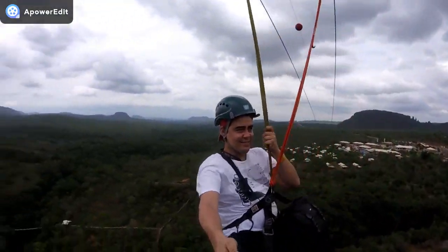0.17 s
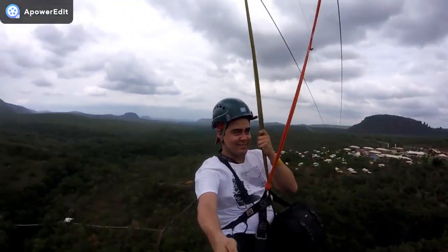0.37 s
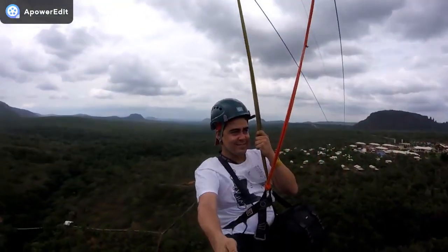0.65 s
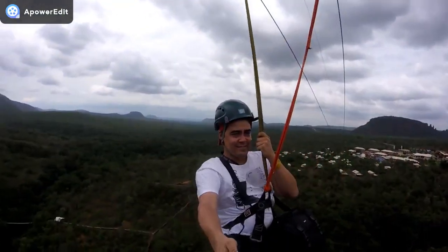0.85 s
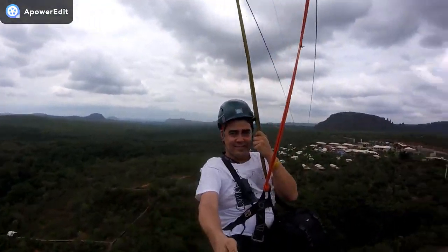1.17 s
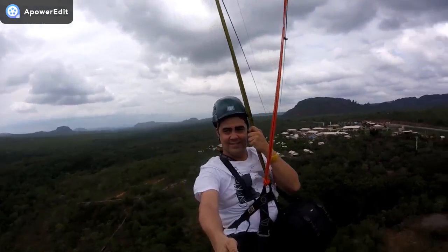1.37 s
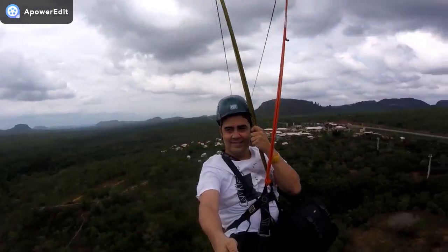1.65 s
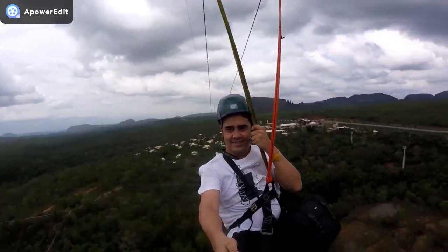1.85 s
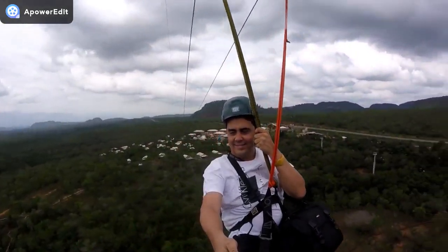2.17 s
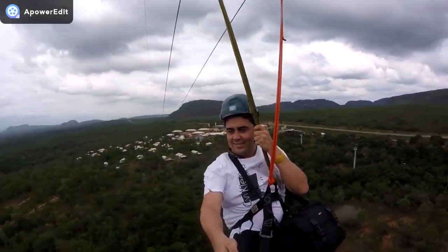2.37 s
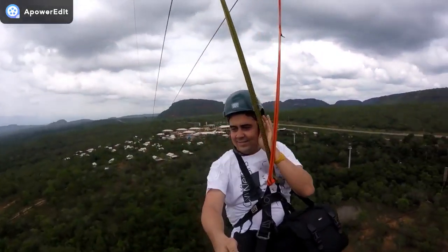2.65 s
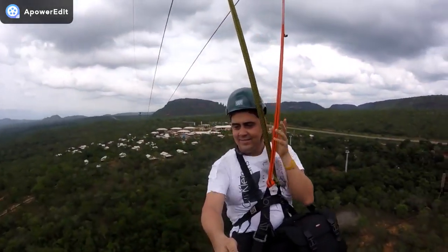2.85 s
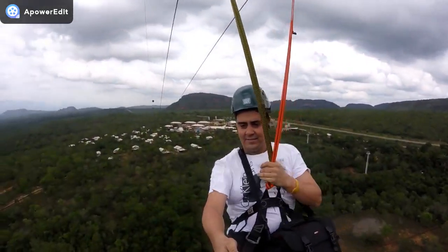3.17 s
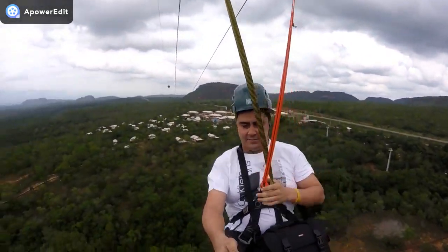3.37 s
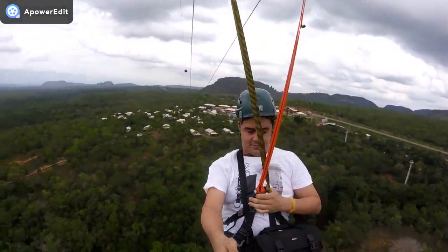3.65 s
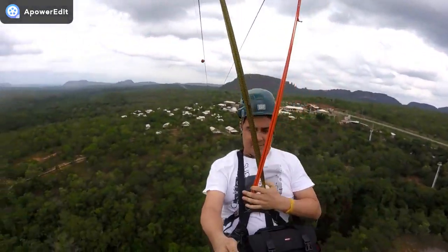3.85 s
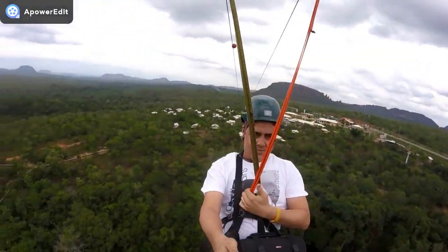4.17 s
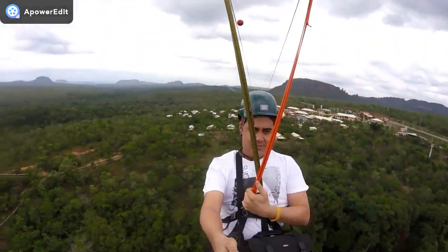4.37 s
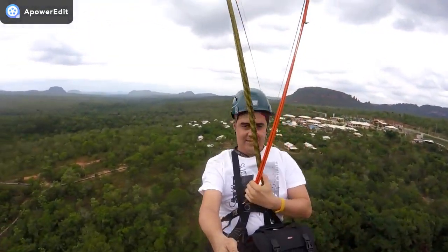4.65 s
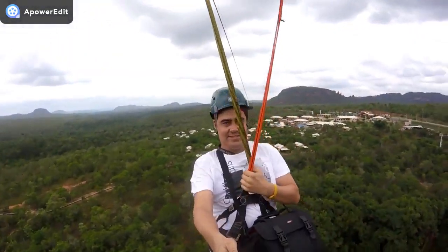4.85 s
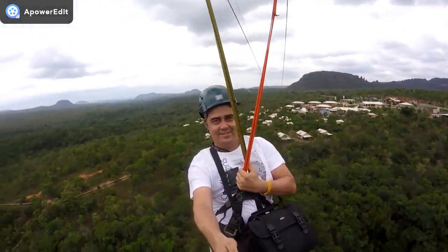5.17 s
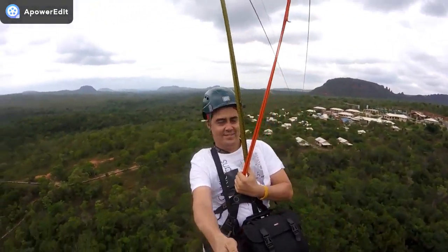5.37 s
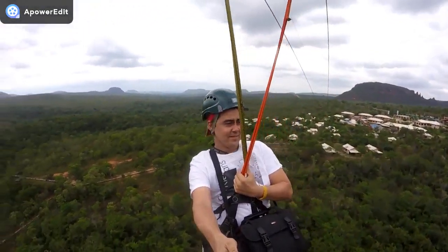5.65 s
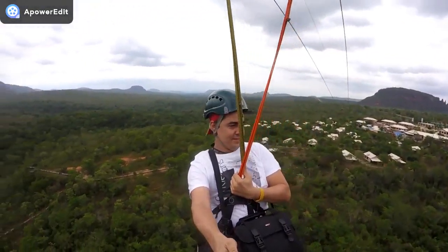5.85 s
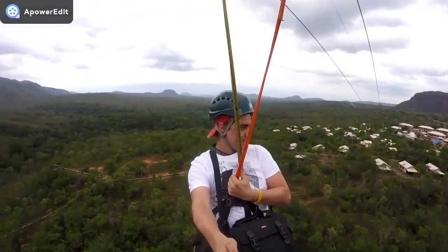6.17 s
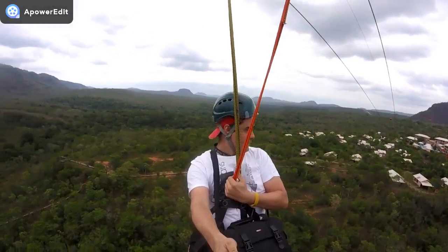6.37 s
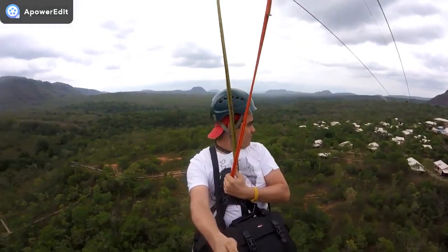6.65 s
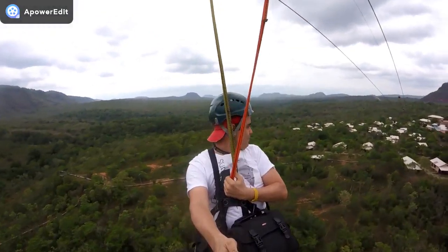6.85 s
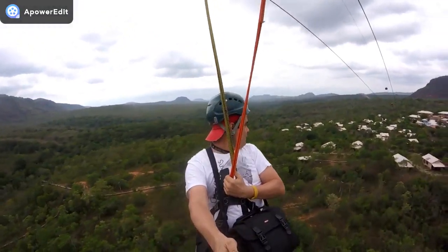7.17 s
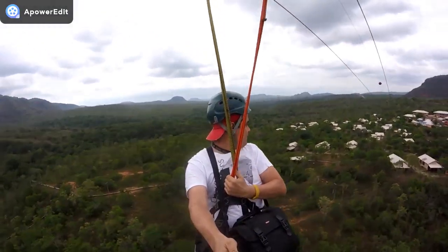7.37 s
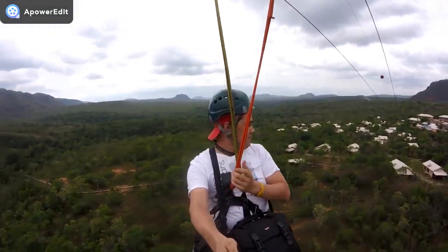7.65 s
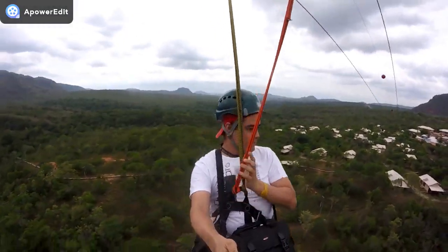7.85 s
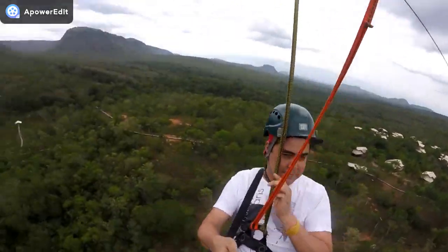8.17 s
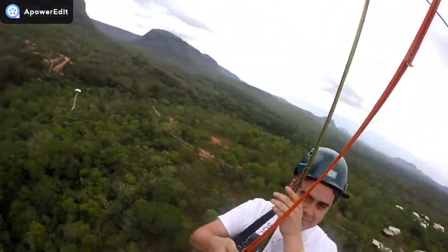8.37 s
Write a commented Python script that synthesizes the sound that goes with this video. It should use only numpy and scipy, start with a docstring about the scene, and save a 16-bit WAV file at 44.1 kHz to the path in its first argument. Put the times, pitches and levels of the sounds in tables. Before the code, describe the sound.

Outdoors high on a zipline, strong wind buffets a cased microphone held in the airstream. Deep rumble heaves and thumps throughout, densest in the first three seconds with light slapping flutters. A hollow, breathy hum swells and fades, while hiss shivers above. A thin high pulley whine runs beneath, sinking slightly in pitch. Near the end the hum sharpens into a loud, wavering hoot.

```python
"""On a zipline: a rider glides down the cable, holding a cased camera out into a strong airstream.
Wind buffets the microphone as low noise whose level heaves and thumps. Eddies blow a hollow wavering hum
on the case, as noise, spread tones and a tone; fine turbulence hisses as noise bands and wall resonances.
The trolley's pulleys run over the strands of the steel cable: harmonics of the strand rate make a thin
whine that sinks as the ride slows."""
import sys
import numpy as np
from scipy import signal
from scipy.fft import rfft, irfft, next_fast_len
from scipy.io import wavfile
from scipy.ndimage import uniform_filter1d

SR = 44100
rng = np.random.default_rng(int(sys.argv[2]) if len(sys.argv) > 2 else 0)


def store_wav(level_fs):
    """Save 16-bit WAV to argv[1]."""
    pcm = np.round(np.clip(np.atleast_2d(level_fs), -1, 1) * 32767)
    wavfile.write(sys.argv[1], SR, pcm.T.astype(np.int16))


N = 375732  # samples


def from_db(db):
    """Decibels to gain."""
    return 10 ** (np.asarray(db) / 20)


def rms_one(x):
    """Scale to unit rms."""
    return x / np.sqrt(np.mean(x ** 2) + 1e-20)


def in_time(rows):
    """Each column of a curve, joined by straight lines, at every sample."""
    times, *columns = np.transpose(rows)
    t = np.arange(N) / SR
    return [np.interp(t, times, column) for column in columns]


def swells(rows):
    """Bell-shaped changes of level in dB, from rows of (t/s, half-length/s, change/dB)."""
    t = np.arange(0, N + 100, 100) / SR     # a coarse grid is enough for such slow curves
    change_db = np.zeros(len(t))
    for centre_s, half_s, db in rows:
        change_db += db * np.exp(-np.minimum(((t - centre_s) / half_s) ** 2, 30))
    return np.interp(np.arange(N) / SR, t, change_db)


def drift(rate):
    """Smooth random motion of rms 1 that turns about rate times a second: noise through two equal poles."""
    step = 20       # samples between the points of the slow motion
    pole = np.exp(-2 * np.pi * rate * step / SR)
    noise = rng.standard_normal(N // step + 2002)
    slow = signal.lfilter([1], [1, -2 * pole, pole ** 2], noise)[2000:]     # drop the filter's start-up
    return np.interp(np.arange(N) / step, np.arange(len(slow)), rms_one(slow))


def shaped(x, gain_at):
    """Filter x by a gain that is a function of frequency; unit rms."""
    size = next_fast_len(N + SR // 4)
    hz = np.maximum(np.arange(size // 2 + 1) * SR / size, 1)
    return rms_one(irfft(rfft(x, size) * gain_at(hz), size)[:N])


def coloured(points):
    """Noise with a colour given as (f/Hz, density/dB), silent outside its range; unit rms."""
    freqs, levels = np.transpose(points)

    def gain_at(hz):
        return from_db(np.interp(np.log(hz), np.log(freqs), levels, left=-np.inf, right=-np.inf))

    return shaped(rng.standard_normal(N), gain_at)


def resonant(drive, modes):
    """The drive rings in steep-sided resonances (f/Hz, width/Hz, level/dB), added in power; unit rms."""
    def gain_at(hz):
        power = 0
        for f, width, db in modes:
            power = power + (from_db(db) / (1 + 2 * ((hz - f) / width) ** 2)) ** 2
        return np.sqrt(power)

    return shaped(drive, gain_at)


def steadied(x, seconds):
    """Hold the strength of x even over spans longer than the given time."""
    power = uniform_filter1d(x ** 2, max(int(seconds * SR), 2))
    return x / np.sqrt(power + 1e-6)


def wavering(hz, width_hz):
    """A tone whose strength and phase wander, spreading it over about the given width; unit rms."""
    phase = 2 * np.pi * np.cumsum(hz) / SR
    return rms_one(drift(width_hz) * np.cos(phase) + drift(width_hz) * np.sin(phase))


def buffeting():
    """Large eddies press on the microphone and now and then thump it; smaller ones flutter on top."""
    # push of the wind, before trims: t/s, rumble level/dB, flutter level/dB
    wind = [(0, -9, -21), (.2, -13.5, -19.5), (.65, -18, -24), (.82, -16, -20.5), (1.33, -14.5, -18.5),
            (1.6, -12.5, -23), (2.0, -12, -21), (2.5, -14.5, -22.5), (2.8, -15, -16), (3.2, -15, -19),
            (3.8, -16, -17), (4.15, -12.5, -21), (4.75, -15, -24), (5.6, -14.5, -19), (6.05, -20, -16.5),
            (7.1, -14, -22), (8.07, -17, -16), (8.25, -26, -24)]
    # thumps (+) and lulls (-) of the large eddies: t/s, change of the rumble/dB
    thumps = [(.05, -2.5), (.24, 5), (.44, 5.5), (.53, -1), (.8, -3), (.92, 5.5), (1.08, 4), (1.48, 5.5),
              (1.56, -6), (1.77, 5.5), (2.66, -8), (2.82, 7), (3.0, -7), (3.08, 6), (4.62, -2), (5.17, 8),
              (5.7, 6.5), (6.17, -10)]
    # noise colour of the large eddies: f/Hz, density/dB
    rumble_colour = [(8, -17), (16, -5), (25, 1.5), (38, 7.5), (50, -9), (65, -8), (100, -42)]
    # noise colour of the smaller eddies: f/Hz, density/dB
    flutter_colour = [(40, -11), (62, 0.5), (90, 0.5), (115, -6.5), (150, -12.5), (200, -25), (300, -44),
                      (600, -56)]
    thump_half_s = 0.034
    sway_db, sway_per_s = 1.66, 6       # chance swells of the rumble, besides the thumps

    rumble_db, flutter_db = in_time(wind)
    thump_db = swells([(s, thump_half_s, db) for s, db in thumps])
    heave_db = thump_db + sway_db * drift(sway_per_s)
    rumble = from_db(rumble_db + heave_db - 0.9) * steadied(coloured(rumble_colour), seconds=0.162)
    flutter = from_db(flutter_db + 0.06) * steadied(coloured(flutter_colour), seconds=0.17)
    return rumble + flutter


def case_hum(gust):
    """Eddies ring the cavities: ragged ones all of them, evenly shed ones those near their own rate."""
    # eddies shed by the case: t/s, shedding rate f/Hz, regular share 0-1
    eddies = [(0, 335, 0.07), (.7, 312, .25), (1.3, 300, 0.21), (2.5, 330, 0.12), (3.8, 330, 0.01),
              (4.5, 340, .47), (5.0, 330, 0.66), (5.75, 267.9, 0.77), (6.4, 303.6, 0.64), (6.85, 320, 1),
              (7.1, 314, 0.99), (7.42, 328, .63), (7.7, 314, .7), (8.1, 316, 0.89), (8.16, 356, 0.99),
              (8.27, 369, 1), (8.4, 359, 0.98), (8.52, 377, 1)]
    # how hard the eddies blow on the case, before trim and gusts: t/s, level/dB
    blowing = [(0, -30), (.65, -20.5), (1.05, -22), (1.45, -27.5), (2.4, -32), (3.5, -29), (4.35, -24),
               (4.72, -16.5), (5.0, -21.5), (5.4, -24.5), (5.7, -22), (6.45, -23), (6.98, -14), (7.5, -20),
               (8.1, -20), (8.17, -10), (8.36, -7.8), (8.52, -11)]
    # brief surges (+) and stalls (-) of the hum: t/s, half-length/s, change/dB
    surges = [(.09, 0.026, 13), (.52, .02, 3), (.62, 0.013, 3.5), (.71, 0.018, 6.5), (.82, 0.027, 7.5),
              (.9, 0.046, -8), (1.11, .02, 5), (1.21, 0.036, -15), (1.28, 0.017, 3), (1.95, .02, 11),
              (5.24, .05, -10), (6.07, .025, 7), (6.86, .035, 1.5), (6.93, .02, -17), (7.19, 0.023, -13),
              (7.43, 0.031, -12), (8.0, .015, 2.5), (8.05, .02, -5)]
    # air cavities of the case: f/Hz, width/Hz, relative level/dB
    cavities = [(260, 116, -13), (316.4, 27, -8.5), (353.3, 18.7, 0), (396, 32, -11), (444, 29, -11.5)]
    # a narrow gap that rings along more steadily: f/Hz, width/Hz, relative level/dB
    narrow_gap = [(440.7, 31, 0)]
    # shed faster than this, the eddies turn largely into a tone at their own shedding rate
    lock_hz, lock_range_hz, lock_share = 337.5, 16, 0.71

    shed_hz, regular = in_time(eddies)
    hum_db = in_time(blowing)[0] + swells(surges)
    locked = lock_share * np.clip((shed_hz - lock_hz) / lock_range_hz, 0, 1)

    ragged = steadied(resonant(rng.standard_normal(N), cavities), seconds=0.11)
    sung = steadied(resonant(wavering(shed_hz, width_hz=33), cavities), seconds=0.053)
    tone_hz = shed_hz * (1 + 0.0258 * drift(20.7))
    tone = np.sqrt(2) * np.sin(2 * np.pi * np.cumsum(tone_hz) / SR)
    even = np.sqrt(1 - locked) * sung + np.sqrt(locked) * tone      # the two beat against each other
    hum = np.sqrt(1 - regular) * ragged + np.sqrt(regular) * even

    gust_db = 0.83 * gust * (1.5 - regular)     # ragged hum shivers more
    gap_db = -31 + 0.26 * hum_db                # swells only a little with the hum
    gap = from_db(gap_db) * resonant(rng.standard_normal(N), narrow_gap)
    return from_db(hum_db - 1.0 + gust_db) * hum + gap


def slap_envelope(rise_s, fall_s):
    """Each short slap of air on the case swells quickly and dies away exponentially."""
    # slaps, each peaking one rise time after its t: t/s, relative peak level/dB
    slaps = [(0.093, -11), (0.1344, -14.5), (0.1824, -11.5), (0.862, -12), (0.882, -10.5), (1.105, -15),
             (1.2136, -12), (1.2757, -12.5), (1.3864, -10), (1.461, -11.5), (1.6444, -12), (1.7374, -14)]
    envelope = np.zeros(N)
    for s, db in slaps:
        near = np.arange(max(int((s - 0.05) * SR), 0), min(int((s + 0.15) * SR), N))
        past_peak = near / SR - s - rise_s
        decay = np.maximum(-past_peak / rise_s, past_peak / fall_s).clip(0, 20)
        envelope[near] += from_db(db) * np.exp(-decay)
    return envelope


def airstream(gust):
    """Fine turbulence hisses on the case; all its bands shiver with the same gusts."""
    # broad rush, before trim and gusts: t/s, level/dB
    rush_level = [(0, -38), (.12, -31.5), (.3, -38.5), (.65, -38), (.85, -36), (1.8, -34), (2.5, -35.5),
                  (3.75, -30.5), (4.35, -29.5), (4.7, -33), (4.95, -31.5), (5.9, -34.5), (6.3, -38),
                  (7.9, -37), (8.25, -41.5), (8.52, -35)]
    # hiss in the case walls, which swells and ebbs as the rider swings, before trim and gusts: t/s, level/dB
    hiss_level = [(0, -31.5), (1.35, -28.5), (1.66, -31), (2.25, -24), (2.95, -27), (3.4, -22.5),
                  (4.35, -24.5), (4.7, -30.5), (4.92, -26.5), (5.32, -31.5), (5.6, -27.5), (6.15, -25.5),
                  (6.48, -22), (6.95, -25), (7.93, -25), (8.07, -22.5), (8.28, -30), (8.52, -30)]
    # sizzle around 5 kHz, before trim and gusts: t/s, level/dB
    sizzle_level = [(0, -40.5), (1.3, -37), (1.75, -40), (3.5, -36), (5.3, -39), (6.0, -36.5),
                    (6.45, -32.5), (8.03, -33.5), (8.52, -45)]
    # top treble, before trim and gusts: t/s, level/dB
    top_level = [(0, -39.5), (.3, -47), (1.4, -42), (2.2, -48), (3.6, -44), (5.05, -42.5), (5.5, -45.5),
                 (7.0, -44), (8.05, -44.5), (8.52, -53)]
    # wall resonances of the case: f/Hz, width/Hz, relative level/dB
    wall_modes = [(1350, 314, -11), (1907, 275, -7), (2103, 172, 0.5), (2425, 138, 2), (2780, 120, -7),
                  (2970, 250, -7.5), (3135, 210, -15.5), (3450, 425, -1.5), (3560, 130, -7)]
    # noise colours of rush, sizzle and top treble: f/Hz, density/dB
    rush_colour = [(120, 10), (220, 9), (430, 0), (540, 1), (800, -1), (1000, 2.5), (1400, 2), (2200, 1),
                   (5000, -23)]
    sizzle_colour = [(3000, -24), (3900, -2), (4450, -5), (4750, -1), (5000, 1.5), (5250, 3), (5500, 1.5),
                     (5750, -4), (6000, 2.5), (6400, 2.5), (6650, -2), (7050, -27), (8500, -50)]
    top_colour = [(5500, -14), (7300, 5), (8500, 1), (9300, 4), (10000, -4), (11600, -6), (12700, -8.5),
                  (13800, 0), (15000, -14)]

    rush_db, hiss_db = in_time(rush_level)[0], in_time(hiss_level)[0]
    sizzle_db, top_db = in_time(sizzle_level)[0], in_time(top_level)[0]
    walls = resonant(rng.standard_normal(N), wall_modes)
    open_air = coloured(rush_colour)

    # slaps add in power to the steady rush and hiss
    slap = from_db(-11.0) * slap_envelope(rise_s=0.0039, fall_s=0.012)
    rush = np.hypot(from_db(rush_db + 0.3 + 1.34 * gust), 0.37 * slap) * open_air
    hiss = np.hypot(from_db(hiss_db - 0.22 + 1.1 * gust), slap) * walls
    sizzle = from_db(sizzle_db + 0.58 + 0.49 * gust) * coloured(sizzle_colour)
    top = from_db(top_db - 1.2 + 0.78 * gust) * coloured(top_colour)
    return rush + hiss + sizzle + top


def trolley():
    """The pulleys ride over the twisted strands: clear third and fifth harmonics among rougher ones."""
    # speed of the ride, as the rate of cable strands under the pulleys: t/s, strand rate f/Hz
    pulley = [(0, 1928), (.4, 1885), (.75, 1884), (1.0, 1850), (2.2, 1843), (3.2, 1856), (3.55, 1854),
              (4.07, 1868), (4.32, 1840), (4.52, 1871), (5.2, 1872), (5.52, 1853), (6.55, 1823),
              (6.8, 1838), (7.55, 1820), (7.95, 1785), (8.15, 1803), (8.4, 1772)]
    # strength of the whine, before trims: t/s, 2nd, 3rd and 5th harmonic level/dB (5th leads all the upper ones)
    whine = [(0, -57, -49, -58), (.65, -54, -54, -58), (1.0, -54, -42, -54), (1.45, -55, -45.5, -47.5),
             (2.6, -44, -44, -66), (3.6, -34.5, -40.5, -51), (4.3, -44, -39, -47.5), (5.15, -55, -45, -48),
             (5.7, -49, -42, -51), (6.8, -33.5, -36, -54), (7.9, -36, -35.5, -53), (8.2, -48, -44, -53),
             (8.52, -49, -57, -59)]
    # rough upper harmonics: multiple of the strand rate, relative level/dB, width/Hz
    rough_harmonics = [(4, -0.5, 42), (5, -1.5, 43), (6, -8, 70), (7, -15, 70), (8, -20, 80)]

    strand_hz = in_time(pulley)[0] * (1 + 0.0018 * drift(17.3) + 0.0009 * drift(4))
    second_db, third_db, fifth_db = in_time(whine)
    phase = 2 * np.pi * np.cumsum(strand_hz) / SR
    clear_third = np.sqrt(2) * np.sin(3 * phase)
    clear_fifth = np.sqrt(2) * np.sin(5 * phase)

    second = wavering(2 * strand_hz, width_hz=6.3)
    third = clear_third + from_db(-6) * wavering(3 * strand_hz, width_hz=40)
    rough = sum(from_db(db) * wavering(k * strand_hz, width) for k, db, width in rough_harmonics)
    upper = from_db(-4.5) * clear_fifth + from_db(-3.5) * rough
    whine_low = from_db(second_db - 2.5) * second + from_db(third_db - 0.5) * third
    return whine_low + from_db(fifth_db) * upper


def scene():
    """The air is choppy at first and smoother once the rider has swung round."""
    choppiness = np.interp(np.arange(N) / SR, [1.8, 2.4], [1.4, 0.7])
    gust = choppiness * drift(30.0)
    return (buffeting() + case_hum(gust) + airstream(gust) + trolley())[None, :]


def record(dry):
    """The highest peaks are rounded towards 0.9 and a steep low-pass cuts the top."""
    cutoff_hz = 15000
    rounded = dry / (1 + (dry / 0.9) ** 8) ** (1 / 8)
    low_pass = signal.ellip(12, 0.1, 90, cutoff_hz, fs=SR, output="sos")
    return signal.sosfilt(low_pass, rounded)


dry = scene()
out = record(dry)
store_wav(out)
```